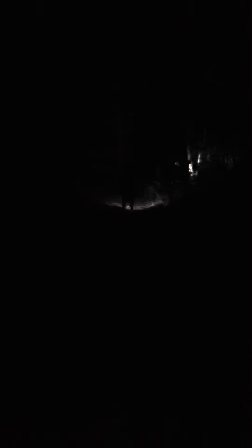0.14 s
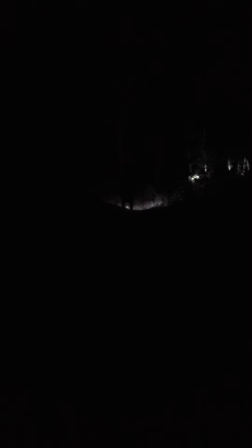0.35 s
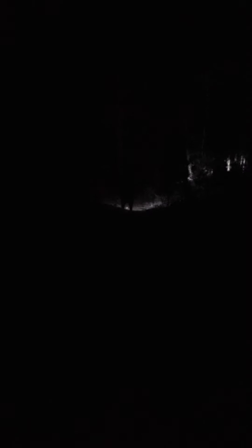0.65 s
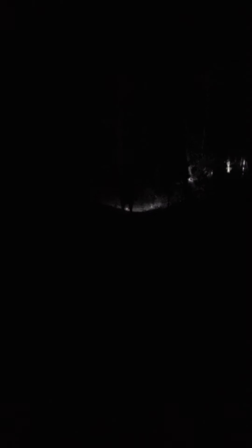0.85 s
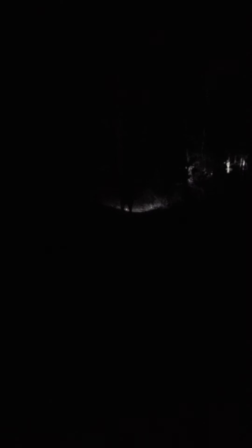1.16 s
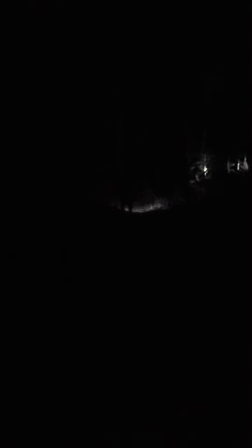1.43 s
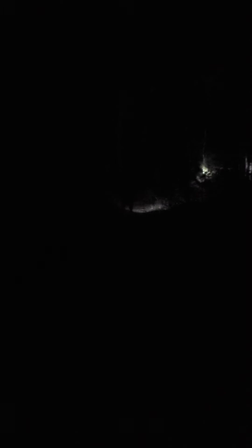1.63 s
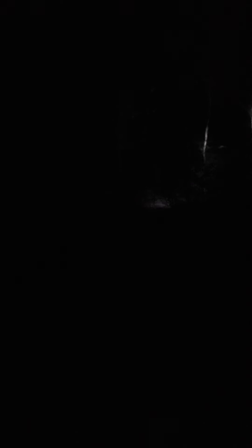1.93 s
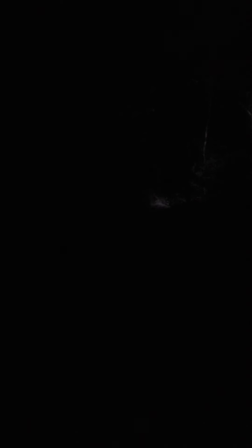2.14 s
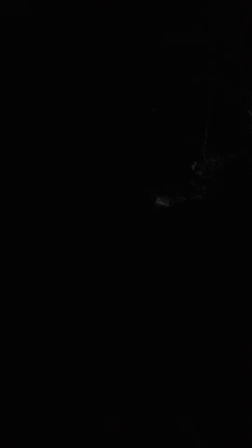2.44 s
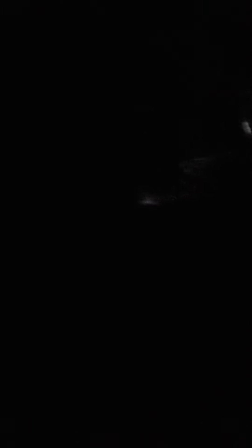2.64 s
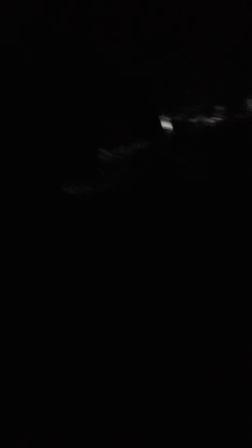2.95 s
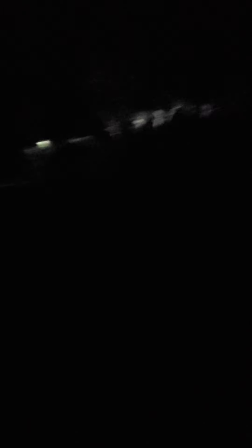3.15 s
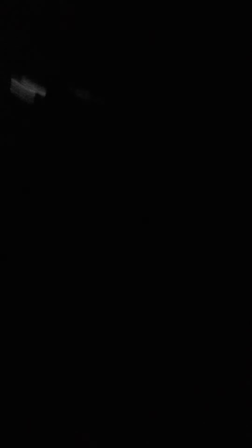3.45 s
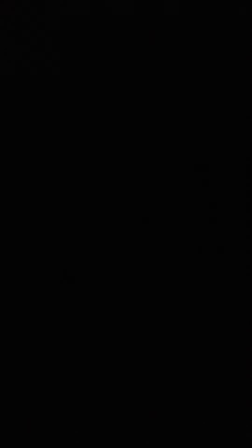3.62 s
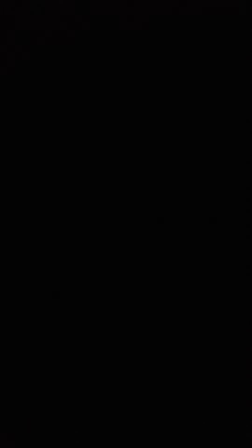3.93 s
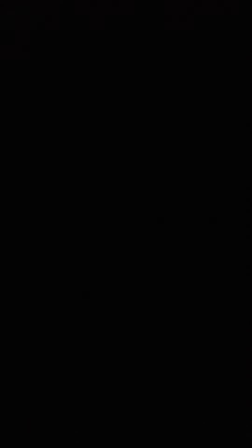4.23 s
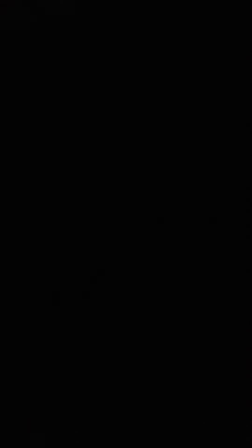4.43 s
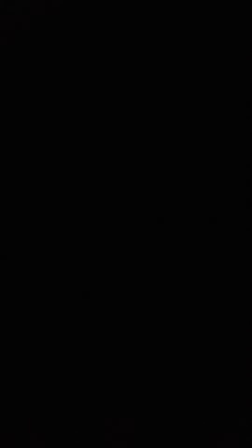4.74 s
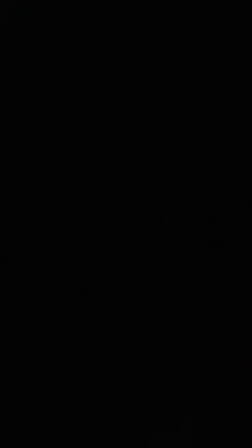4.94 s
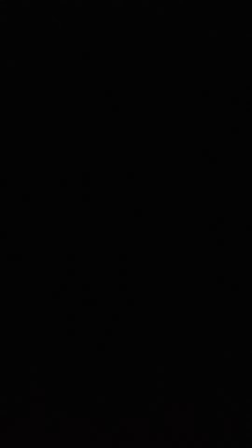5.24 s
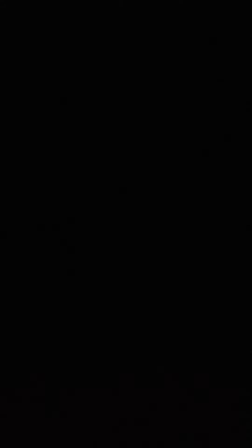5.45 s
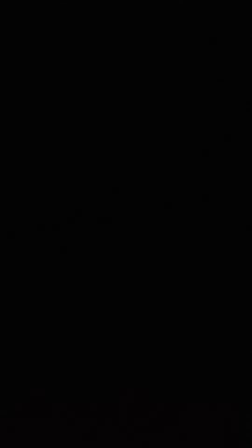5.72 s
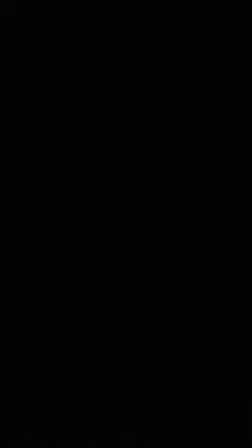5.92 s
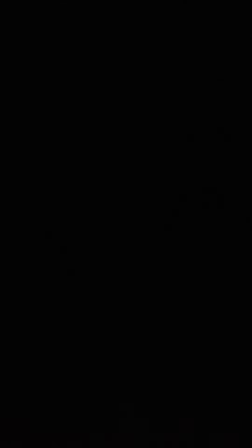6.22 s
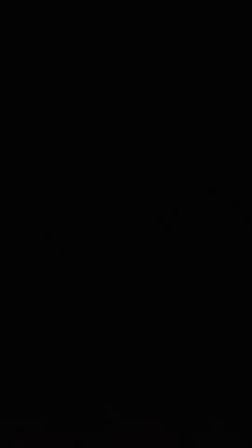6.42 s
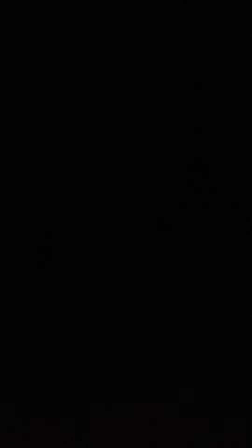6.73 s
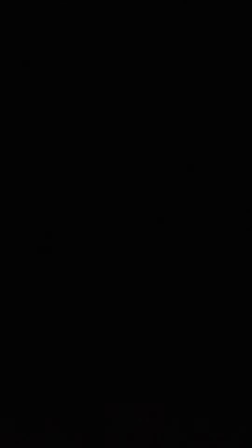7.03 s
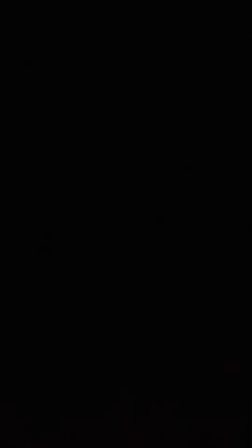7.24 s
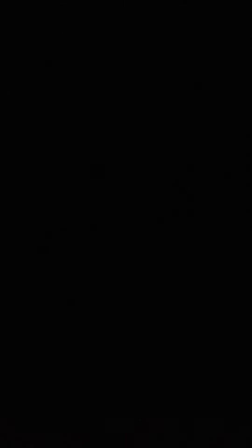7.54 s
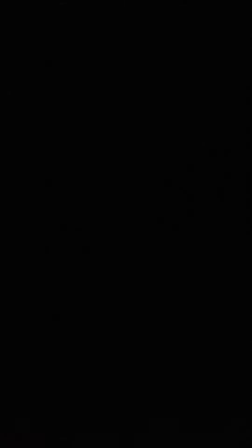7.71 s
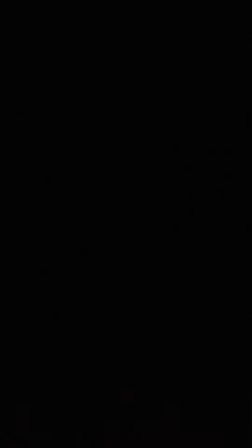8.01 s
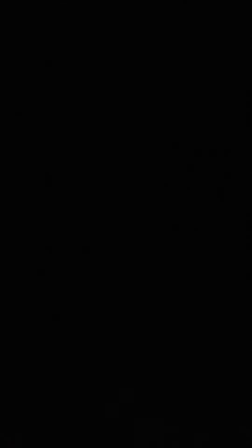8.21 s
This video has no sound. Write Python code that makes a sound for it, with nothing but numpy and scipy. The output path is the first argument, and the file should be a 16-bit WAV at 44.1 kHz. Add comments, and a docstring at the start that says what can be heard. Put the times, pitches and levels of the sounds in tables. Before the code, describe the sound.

A quiet nighttime forest chorus of several kinds of crickets runs throughout, with short nearer trills and bursts of hissing katydid rasp. Soft low thuds, finger scuffs and small clicks come from handling close to the microphone. A sharp, loud knock a little after the middle briefly ducks the insects, which gradually recover. The sound leans heavily left, with a faint low rumble on the right.

```python
"""Woods at night. From the start, tree, field and ground crickets trill all around by scraping their
wings, and katydids rasp in pulsing bouts. From about 2 s, a hand now and then bumps, rubs and clicks
the case of a camera. Near 5.3 s one hard click makes its gain control turn everything down, and the
level takes seconds to creep back while the insects sing on. All along, the right microphone is
covered and hears little but rumble."""
import sys
import numpy as np
from scipy import signal
from scipy.fft import rfft, irfft, next_fast_len
from scipy.io import wavfile

SR = 44100
rng = np.random.default_rng(int(sys.argv[2]) if len(sys.argv) > 2 else 0)


def file_out(sig):
    """Save sig as 16-bit WAV at sys.argv[1]."""
    # one column per channel
    cols = np.atleast_2d(sig).T
    # limit, then scale
    lim = np.clip(cols, -1, 1)
    pcm = np.round(lim * 32767).astype(np.int16)
    wavfile.write(sys.argv[1], SR, pcm)


N = 369116
T = np.arange(N) / SR

# katydid bouts; swell is how far the middle stands above the ends, hiss is relative to the wing ring:
# start_s, end_s, level_db, hiss_db, swell_db, fade_db_per_s, beats_per_s, beat_depth_db
KATYDID_BOUTS = [(-.1, .02, -49, -5, 4.5, 26, 12, 1.5), (0.741, 1.581, -45, -1.8, 11, 25, 12.3, 0.5),
                 (1.445, 2.08, -54.5, -1, 2, 32, 11, 0.5), (2.489, 2.796, -56.3, 0.7, -1.5, 50, 13, 2),
                 (2.823, 3.144, -56, -2.5, -2, 50, 12.5, 0.5), (3.15, 3.42, -55.3, .8, 1, 60, 11.2, 4.5),
                 (3.707, 4.116, -54, -1.3, 4, 58, 12, 1), (4.57, 5.34, -43.3, -.8, 11, 65, 12, 4.2),
                 (5.797, 6.597, -62.5, -5.5, -3.5, 22, 15, -0.5),
                 (6.185, 6.65, -64.7, 1.5, 1, 60, 11.9, 9.5), (6.66, 6.97, -55.3, 1.4, 1, 80, 12.4, 8),
                 (6.994, 7.25, -56, -2.5, -2, 50, 13, 1), (7.258, 7.79, -45.6, -1.3, 4, 90, 11.8, 3.2),
                 (7.82, 8.08, -55.5, -2, 0, 42, 10.1, 3), (8.294, 8.5, -56.5, -6.5, 0, 28, 12, 2)]
# the ring of a katydid's wing: frequency_hz, level_db
WING_SPECTRUM = [(5600, -37), (6600, -15), (7300, -7), (7850, -2), (8350, -6.5), (8900, -15),
                 (10500, -23.5)]
# the hiss above that ring: frequency_hz, level_db
HISS_SPECTRUM = [(7500, -32), (9000, -8), (9900, -2.5), (10900, 2), (12500, 0), (14000, -3), (15700, -5)]
# cricket choirs, each a group of singers; the first two rows together make one tree-cricket chorus near 2600
# Hz: pitch_hz, spread_hz, strokes_per_s, pitch_fall_hz, level_db
CRICKET_CHOIRS = [(2584, 60, 46, 106, -49), (2534, 170, 52, 254, -55.5), (3031, 200, 62, 305, -60.5),
                  (4678, 110, 43, 240, -57.5), (5567, 380, 71, 560, -55.5)]
# nearer single insects: start_s, end_s, pitch_hz, level_db
NEAR_TRILLS = [(0.208, .55, 4590, -54.5), (.468, .88, 4220, -63), (1.149, 1.6, 4630, -57),
               (2.031, 2.28, 4600, -60), (2.216, 2.68, 4220, -63), (2.505, 2.82, 4570, -59),
               (3.197, 3.65, 4670, -62.5), (3.49, 3.6, 14850, -64), (3.5, 3.64, 10750, -74),
               (4.24, 4.68, 4210, -63), (4.558, 4.84, 4590, -52), (4.76, 5.02, 4695, -53),
               (4.904, 5.18, 4440, -61.5), (5.73, 5.81, 14900, -69), (6.153, 6.52, 4240, -63.5),
               (6.675, 6.94, 4590, -53.5), (7.713, 8.06, 4235, -62.5)]
# blows on the case; crack and right side are relative to the blow:
# time_s, strength_db, centre_hz, crack_db, right_db
CASE_CLICKS = [(3.402, -27, 1300, -17, -26), (3.424, -10.5, 1200, -39, -32), (3.4404, -13, 835, -15.5, -31),
               (3.944, -32, 580, -22, -27), (4.112, -23.5, 1940, -10, -28), (5.025, -26.5, 1630, 4.5, -26),
               (5.074, -28.5, 850, -23, -23), (5.2903, -8, 890, 4.5, -18), (5.3101, 5.5, 1130, -10, -15.5),
               (5.3122, 1, 480, -8.5, -16.5), (5.417, -13.5, 640, -14.5, -18)]
# the tones the case rings with: pitch_hz, ring_time_s (to fall by 60 dB), level_db
CASE_TONES = [(385, 0.023, -6), (660, 0.02, -2.5), (830, 0.0051, 3), (1090, 0.0073, 5), (1417, 0.012, -0.5),
              (1890, 0.011, 3), (2300, .004, -5)]
# how well the small case gives off each frequency: frequency_hz, gain_db
CASE_RADIATION = [(90, -8), (260, -9.5), (370, 2), (2000, -1), (3800, 10), (9000, -17)]
# the crack of a dull knock: frequency_hz, level_db
DULL_CRACK = [(900, 1), (2000, 6), (3000, -2.5), (3900, -10.5), (4600, 1), (7000, -0.5), (9000, -20),
              (12500, -10), (15700, -19.5)]
# the crack of a sharp click: frequency_hz, level_db
BRIGHT_CRACK = [(1000, -7), (3700, -2), (5000, -10), (7000, -4), (9000, -5), (10200, -3), (11700, -2),
                (12100, 15), (12600, -9.5), (14000, 0), (15700, 0)]
# what the case carries of a crack to the covered microphone: frequency_hz, gain_db
THROUGH_CASE = [(2000, 2.5), (6800, -2.5), (7800, -17.5), (15700, -23)]
# soft bumps of the hand: time_s, pitch_hz, left_db, right_db
HAND_BUMPS = [(1.793, 54.6, -21.5, -62), (1.848, 63.5, -42, -65), (1.907, 44, -28, -60),
              (2.273, 60, -73, -38.5), (2.309, 67.4, -73, -34.5), (3.611, 45.7, -57, -28.5),
              (4.2, 39.8, -47, -54), (5.306, 75, -41, -53), (7.94, 45, -74, -41)]
# fingers sliding on the case: middle_s, half_length_s, centre_hz, left_db, right_db
FINGER_RUBS = [(1.869, 0.062, 33, -40.5, -71), (2.314, 0.029, 180, -83, -58), (3.173, 0.036, 785, -54, -84),
               (3.392, 0.075, 990, -51, -79), (3.613, 0.0048, 128, -76, -43.5), (3.64, .1, 1120, -60, -87),
               (3.943, 0.039, 476, -51, -80), (4.088, 0.074, 514, -56.5, -74), (4.551, .12, 880, -61, -87),
               (4.816, 0.02, 1500, -57, -80), (5.04, 0.019, 880, -49.5, -74), (5.129, .058, 1290, -59, -83),
               (6.414, .015, 650, -61, -76), (7.434, 0.005, 400, -60, -75)]
# night air and far insects at the open microphone: frequency_hz, level_db
AIR_SPECTRUM = [(20, -5), (55, 5), (100, -2.5), (250, -8), (450, -1.5), (900, -8), (1900, -3.5), (2500, 6),
                (3650, -9.5), (4100, -6.5), (5500, 9), (6500, -8), (9000, -23), (15700, -16.5)]
# rumble at the covered microphone: frequency_hz, level_db
RUMBLE_SPECTRUM = [(20, -2.5), (45, -1), (100, -8.5), (250, -19), (500, -25.5), (900, -34), (2000, -37),
                   (4000, -48), (8000, -59.5), (15700, -47)]
# what gets through the cover of the right microphone: frequency_hz, gain_db
THROUGH_COVER = [(300, -13), (1200, -39), (2600, -33), (3600, -26), (4700, -27), (5500, -23), (6600, -40),
                 (8500, -38.5), (10500, -23), (12500, -33), (15700, -32)]


def katydids(far_wing_db=-67, far_hiss_db=-73.5, ticks_per_s=260, tick_decay_s=0.00033):
    """Tiny teeth strike unevenly, so the wing rings and hisses. Far katydids never pause."""
    wing_power, hiss_power = undb(far_wing_db) ** 2, undb(far_hiss_db) ** 2
    for start, end, db, hiss_db, *shape in KATYDID_BOUTS:
        power = (undb(db) * katydid_bout(start, end, *shape)) ** 2
        wing_power += power
        hiss_power += power * undb(hiss_db) ** 2
    strikes = rng.standard_normal((2, N))  # one row for the ring, one for the hiss
    # the hardest strikes stand out of the blur as single ticks
    hard = (rng.random(N) < ticks_per_s / SR) * undb(2.4 * rng.standard_normal(N))
    ticks = signal.lfilter([1], [1, -np.exp(-1 / (tick_decay_s * SR))], hard)
    strikes += level(ticks * rng.standard_normal((2, N)), -10)
    wing = level(colour(strikes[0], WING_SPECTRUM), -0.86) * np.sqrt(wing_power)
    hiss = level(colour(strikes[1], HISS_SPECTRUM), -0.5) * np.sqrt(hiss_power)
    return wing + hiss


def katydid_bout(start, end, swell_db, fade_db_per_s, beats_per_s, depth_db, attack_s=0.029):
    """Loudness of one bout: it starts fast, swells or sags, then fades. Each wing closing is a beat."""
    age = np.maximum(T - start, 0)
    progress = np.minimum(age / (end - start), 1)
    shape_db = -swell_db * (2 * progress - 1) ** 2 - fade_db_per_s * np.maximum(T - end, 0)
    beat = np.sin(np.pi * beats_per_s * age) ** 4 - 3 / 8  # averages to zero
    return (1 - np.exp(-age / attack_s)) * undb(shape_db + depth_db * beat)


def cricket(t, hz, strokes_per_s, fall_hz, unsteady, scatter_db, slip, sounding_share=0.63):
    """Each wing closing draws a row of teeth over a scraper: a short tone that sags in pitch."""
    strokes = rng.random() + np.cumsum(strokes_per_s * (1 + unsteady * wander(t, 4))) / SR
    stroke = strokes.astype(int)
    progress = np.minimum((strokes - stroke) / sounding_share, 1)
    strength, tooth = rng.standard_normal((stroke[-1] + 1, 2)).T
    arch = progress * (1 - progress)
    sag = fall_hz * sounding_share / strokes_per_s / 2 * arch
    cycles = hz * t + sag + slip * tooth[stroke]  # each stroke catches at another tooth
    return undb(scatter_db * strength)[stroke] * arch * np.sin(2 * np.pi * cycles)


def cricket_choir(hz, spread_hz, strokes_per_s, fall_hz, db, singers=4):
    """One species sings out of step, each in its own spot; the highest and lowest are fainter."""
    out = 0
    for offset in np.linspace(-1, 1, singers):
        own_rate = strokes_per_s * (1 + .03 * rng.standard_normal())
        song = cricket(T, hz + offset * spread_hz, own_rate, fall_hz, unsteady=.05, scatter_db=3.2, slip=1)
        out += undb(-5 * offset ** 2) * woods(song, echo_db=1.5)
    return level(out, db)


def near_trills(strokes_per_s=46, fade_s=0.03, half_echo_db=-58):
    """Nearer singers keep an even beat; the fainter one is, the more of it arrives as echo."""
    direct, scattered = np.zeros((2, N))
    for start, end, hz, db in NEAR_TRILLS:
        singing = (T > start) & (T < end)
        t = T[singing]
        song = cricket(t, hz, strokes_per_s, fall_hz=.03 * hz, unsteady=.015, scatter_db=1, slip=.25)
        echo = undb(.8 * (half_echo_db - db))
        fade = np.minimum(np.minimum(t - start, end - t) / fade_s, 1)
        song = level(song, db) * fade / np.hypot(1, echo)
        direct[singing] += song
        scattered[singing] += echo * song
    return direct + woods(scattered, echo_db=30)


def lone_tree_cricket():
    """One tree cricket never stops; its fast, even strokes split its tone into several close pitches."""
    song = cricket(T, hz=2984, strokes_per_s=86.5, fall_hz=280, unsteady=.012, scatter_db=1.5, slip=.07)
    return woods(level(song, -63), echo_db=-4)


def case_clicks(crack_time_s=0.013):
    """Each blow rings the case tones near its own centre frequency and adds a short crack of noise."""
    rings, cracks = np.zeros((2, 2, N))
    t = T[:2048]
    for time_s, db, centre_hz, crack_db, right_db in CASE_CLICKS:
        ring = 0
        for k, (hz, ring_time_s, tone_db) in enumerate(CASE_TONES):
            ring_db = tone_db - 12 * np.log2(hz / centre_hz) ** 2 - 60 * t / ring_time_s
            # neighbouring tones start in opposite directions
            ring += (-1) ** k * undb(ring_db) * np.sin(2 * np.pi * hz * t)
        add(rings, time_s, level(ring, -28), db, db + right_db)
        noise = colour(rng.standard_normal(len(t)), BRIGHT_CRACK if crack_db > 0 else DULL_CRACK)
        crack = level(noise * undb(-60 * t / crack_time_s), crack_db - 25.5)
        add(cracks, time_s, crack, db, db + right_db)
    cracks[1] = colour(cracks[1], THROUGH_CASE)
    return np.array([colour(side, CASE_RADIATION) for side in rings]) + cracks


def hand_bumps(rise_cycles=.58):
    """The hand nudges the camera: a cycle or two of deep thud."""
    out, t = np.zeros((2, N)), T[:8192]
    for time_s, hz, left_db, right_db in HAND_BUMPS:
        rise = hz * t / rise_cycles
        swell = (rise * np.exp(1 - rise)) ** 2
        add(out, time_s, -swell * np.sin(2 * np.pi * hz * t), left_db, right_db)
    return out


def finger_rubs():
    """Skin sticks and slips on the case: many small ticks blur into a scuff."""
    out, t = np.zeros((2, N)), T[:SR // 2]
    octaves = np.linspace(-4, 4, 9)
    for middle_s, half_length_s, centre_hz, left_db, right_db in FINGER_RUBS:
        ticks = rng.standard_normal(len(t)) * undb(6.2 * wander(t, 300))
        band = np.transpose([centre_hz * 2 ** octaves, -4.1 * octaves ** 2])
        pressure = np.exp(-.5 * ((t - t.mean()) / half_length_s) ** 2)
        rub = level(colour(ticks, band), -0.47) * pressure
        add(out, middle_s - t.mean(), rub, left_db, right_db)
    return out


def night_air():
    """Air and far insects blend into a soft, nearly steady hiss."""
    return level(colour(rng.standard_normal(N), AIR_SPECTRUM), -54.5) * undb(.5 * wander(T, 2))


def rumble():
    """A low, fluttering noise at the covered microphone."""
    return level(colour(rng.standard_normal(N), RUMBLE_SPECTRUM), -57) * undb(2.9 * wander(T, 14))


def woods(x, echo_db, echo_time_s=0.91):
    """Trunks and leaves scatter the sound into a short, dense echo; every call is a new path."""
    t = T[:SR // 2]
    tail = rng.standard_normal(len(t)) * undb(-60 * t / echo_time_s)
    echo = undb(echo_db)
    path = echo * tail / np.linalg.norm(tail)
    path[0] += 1  # the direct sound
    return signal.oaconvolve(x, path)[:N] / np.hypot(1, echo)


def undb(db):
    """Turn decibels into a factor to multiply by."""
    return 10 ** (np.asarray(db) / 20)


def level(x, db):
    """Set the average (rms) level."""
    return x * undb(db) / np.sqrt(np.mean(x ** 2) + 1e-20)


def colour(x, points):
    """Shape the tone along a curve of (frequency_hz, gain_db) points."""
    hz, db = np.transpose(points)
    size = next_fast_len(len(x))
    frequencies = np.maximum(np.arange(size // 2 + 1) * SR / size, 1)
    gain = undb(np.interp(np.log(frequencies), np.log(hz), db))
    return irfft(rfft(x, size) * gain, size)[:len(x)]


def wander(t, turns_per_s):
    """A random curve that mostly stays between -1 and 1."""
    place = (t - t[0]) * turns_per_s
    points = rng.standard_normal(int(place[-1]) + 2)
    return np.interp(place, np.arange(len(points)), points)


def add(out, time_s, sound, left_db, right_db):
    """Mix a sound in at the given time, with its own gain on each side."""
    i = int(time_s * SR)
    out[:, i:i + len(sound)] += np.outer(undb([left_db, right_db]), sound[:N - i])


def scene():
    """Insects reach the left microphone freely and the right one through its cover."""
    # the camera turns slowly away from the choirs; tree crickets are the ones below 4000 Hz
    tree_gain, ground_gain = undb(.9 - .2 * T), undb(.3 - .3 * T)
    choirs = sum(cricket_choir(hz, *song) * (tree_gain if hz < 4000 else ground_gain)
                 for hz, *song in CRICKET_CHOIRS)
    insects = choirs + near_trills() + tree_gain * lone_tree_cricket() + katydids()
    left = insects + night_air()
    right = rumble() + colour(woods(insects, echo_db=22), THROUGH_COVER)
    return np.array([left, right]) + case_clicks() + finger_rubs() + hand_bumps()


def record(dry, threshold_db=-15, max_cut_db=7, lag_s=.008, recovery_s=1.39, top_hz=15750):
    """Gain control turns down after a loud peak and creeps back; the highest treble is cut."""
    peak_db = 20 * np.log10(np.abs(dry).max(axis=0) + 1e-9)
    cut_db = np.clip(peak_db - threshold_db, 0, max_cut_db)
    fade = np.exp(-T / recovery_s)
    held_db = np.maximum.accumulate(cut_db / fade) * fade
    gain = undb(-np.interp(T - lag_s, T, held_db))
    treble_cut = signal.ellip(10, .2, 70, top_hz, fs=SR, output="sos")
    return signal.sosfilt(treble_cut, dry * gain)


dry = scene()
out = record(dry)
file_out(out)
```